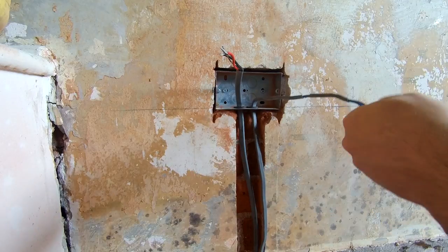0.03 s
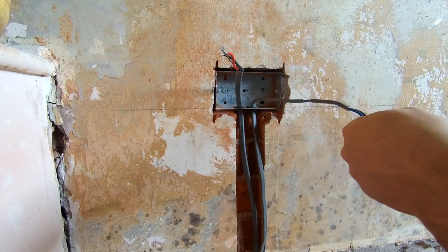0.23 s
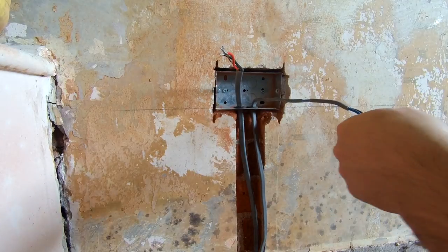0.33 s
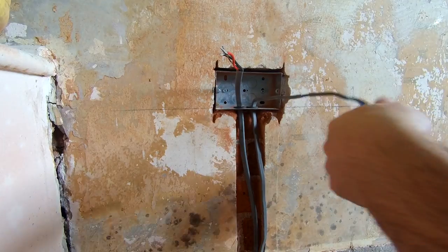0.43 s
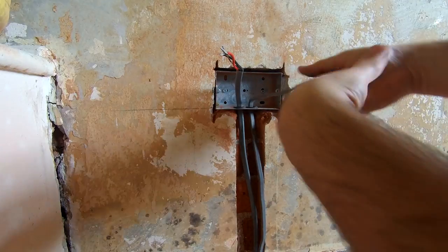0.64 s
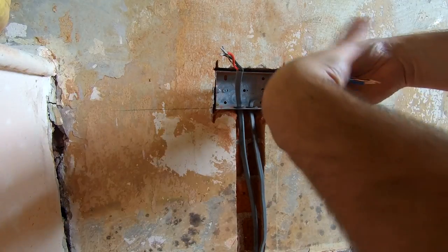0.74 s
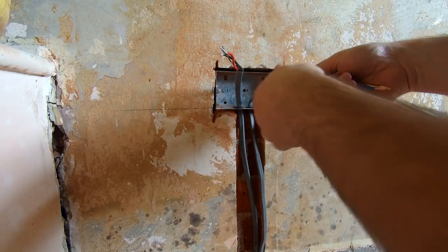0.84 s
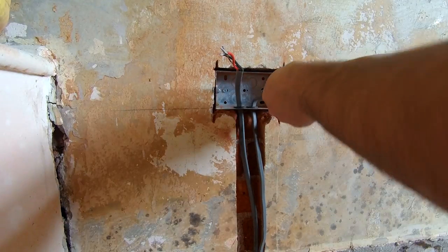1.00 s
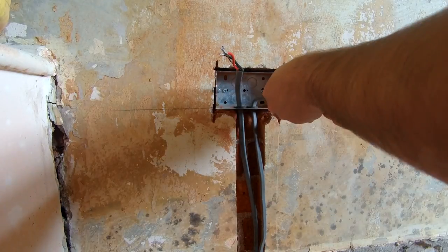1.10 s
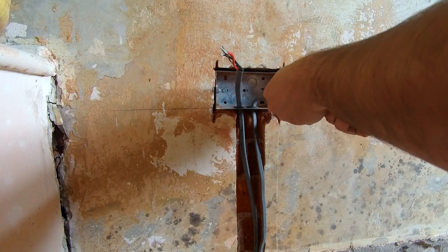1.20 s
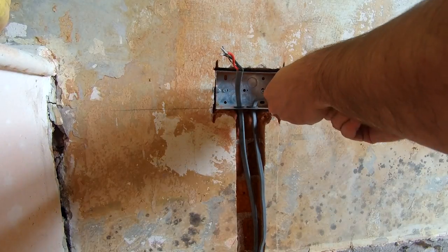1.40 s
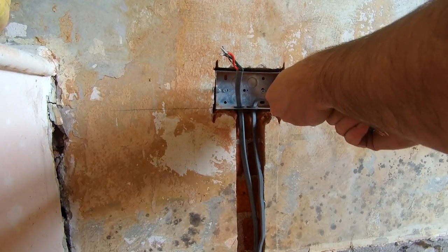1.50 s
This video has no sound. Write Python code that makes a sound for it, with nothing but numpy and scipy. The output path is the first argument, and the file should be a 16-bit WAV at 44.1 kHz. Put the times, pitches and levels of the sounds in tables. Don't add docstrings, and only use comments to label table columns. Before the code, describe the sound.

Wire strippers drop onto a hollow box at about 0.25 s, with a loud boomy thud, steel jaw clacks and plastic handle knocks, a second heavy hit at 0.32 s and weakening bounces until 0.55 s. Bare-room reverberation fades. A faint tap comes near 0.76 s, then soft finger hiss. From 1.15 to 1.53 s, cable quietly ticks and rings a metal socket, with cloth rubbing over low hush.

```python
import sys
import numpy as np
from scipy import signal
from scipy.fft import rfft, irfft
from scipy.io import wavfile
from scipy.ndimage import uniform_filter1d

SR = 44100
rng = np.random.default_rng(int(sys.argv[2]) if len(sys.argv) > 2 else 0)


def how_loud(loudness_db):
    steps = np.asarray(loudness_db, float) / 20
    return 10 ** steps


def master_out(mix):
    frames = np.transpose(np.atleast_2d(mix))
    ceiling = np.clip(frames, -1, 1)
    pcm = np.round(ceiling * 32767).astype(np.int16)
    wavfile.write(sys.argv[1], SR, pcm)


N = 68355

# (frequency [Hz], phase [radians])
FLOOR_PHASE = [(0, 0), (6200, 0.5), (9040, -2.2), (9390, 2.2), (10100, 0.3), (13400, -3), (15100, 12),
               (16400, 8.8)]
# (frequency [Hz], level [dB])
FLOOR_PAN = [(60, 4), (180, 2), (550, -5.5), (1650, -3), (4970, -1.5), (15000, 1.5)]
# (frequency [Hz], phase [radians])
WALL_PHASE = [(0, -1), (5510, 0.53), (7150, -2.7), (9300, -0.4), (12500, 2.15), (14100, 0), (16400, -10.8)]
# (frequency [Hz], level [dB])
WALL_PAN = [(60, -1.3), (240, -1.94), (950, 0.57), (3770, -0.15), (15000, 0.8)]
# (frequency [Hz], correlation [-1..1])
HUSH_SAME = [(60, 0.13), (180, 0.87), (550, 0.46), (1650, 0.49), (4970, 0.64), (15000, 0.23)]


def evened(x):
    return x / np.sqrt(np.mean(x ** 2) + 1e-20)


def read(points, hz):
    f, value = np.transpose(points)
    return np.interp(np.log(hz + 1), np.log(f + 1), value)


def add(mix, s, sound):
    part = mix[round(s * SR):][:len(sound)]
    part += sound[:len(part)]


def colour(x, shape):
    hz = abs(np.fft.fftfreq(2048, 1 / SR))
    log_gain = np.log(how_loud(np.maximum(read(shape, hz), -80)))
    impulse = np.fft.ifft(np.exp(np.conj(signal.hilbert(log_gain)))).real[:1024]
    return signal.oaconvolve(x, impulse / abs(impulse).max())[:len(x)]


def ring(modes, lift_db, spread):
    t = np.arange(SR // 3) / SR
    hz, db, t60 = np.transpose(modes)[:, :, None]
    spot, detune = rng.standard_normal((2, len(modes), 1))
    rise = 1 - np.exp(-t * hz / 0.39)
    decay = how_loud(db + lift_db + 1.9 * spot - 60 * t / t60)
    x = (rise * decay * np.sin(2 * np.pi * hz * (1 + spread * detune) * t)).sum(0)
    return x / abs(x).max()


def noise(shape, same, patchy_db, fade=None):
    frames, hz = N // 256 + 9, np.fft.rfftfreq(1024, 1 / SR)
    a, b, c, d, patches = rng.standard_normal((frames, len(hz), 5)).T
    patches = uniform_filter1d(patches, size=10, axis=0)
    patches = evened(uniform_filter1d(patches, size=10, axis=1))
    db = read(shape, hz)[:, None] + patchy_db * patches
    if fade is not None:
        db = db - 60 * np.arange(frames) * 256 / SR / read(fade, hz)[:, None]
    likeness = np.clip(read(same, hz), -1, 1)[:, None]
    left = a + 1j * b
    right = likeness * left + np.sqrt(1 - likeness ** 2) * (c + 1j * d)
    spectrum = np.array([left, right]) * how_loud(db)
    return evened(signal.istft(spectrum, nperseg=1024, noverlap=768)[1][:, :N])


def placed(x, phase, pan, wet_db, onset_s, scattered=None):
    # (delay [s], left gain [ratio], right gain [ratio])
    reflections = [(.0023, .45, -.3), (.0052, -.2, .3), (.0108, .25, -.1)]
    # (frequency [Hz], t60 [s])
    room_decay = [(60, 0.26), (135, .65), (270, 0.34), (500, 0.56), (1500, 0.47), (3000, 0.51),
                  (6000, 0.43), (11000, 0.33), (16000, 0.17)]
    # (frequency [Hz], correlation [-1..1])
    room_likeness = [(60, .6), (150, 0.44), (500, .5), (1500, 0.65), (4000, 0.57), (8000, 0.3),
                     (14000, -.3)]
    padded = N + 999
    hz = np.fft.rfftfreq(padded, 1 / SR)
    half = np.exp(.5j * read(phase, hz)) * how_loud(read(pan, hz) / 2)
    echoes = 0
    for s, left, right in reflections:
        dulled = np.exp(-2j * np.pi * hz * s - hz / 4000)
        echoes = echoes + np.array([[left], [right]]) * dulled
    direct = irfft(rfft(x, padded) * (np.array([half, 1 / half]) + echoes), padded)[:, :N]

    tail = noise([(60, 0.0032), (16000, 0.00073)], room_likeness, .8, room_decay)
    tail *= np.clip(np.arange(N) / SR / onset_s - .3, 0, 1)
    tail /= np.sqrt((tail ** 2).sum(1).mean())
    source = x if scattered is None else scattered
    return direct + how_loud(wet_db) * signal.fftconvolve(source[None], tail, axes=1)[:, :N]


def box():
    # (time [s], level [dB], lift of deep modes [dB], pitch factor [ratio])
    landings = [
        (.2470, 1.5, 0, .99),
        (0.2809, -8, -1, 1.01),
        (.3200, -0.5, -1.5, 1.175),
        (0.354, -11, -7.5, .96),
        (.3755, -20, -11, 0.84),
        (0.3962, -9, 2.5, .99),
        (0.4221, -13.5, 9.5, 1.2),
        (0.4652, -14, -13, 1.03),
        (0.5088, -23, -8.5, .97),
        (0.547, -42.5, -3, 0.7),
    ]
    # (frequency [Hz], level [dB], t60 [s])
    panel_modes = np.array([(140.9, -22, 0.052), (191, -7, .045), (253.5, -9.5, 0.11), (331.3, 4.5, 0.036),
                            (379, -17.5, 0.047), (528.7, 6.5, 0.026), (590, -10.5, 0.031),
                            (625, -13.5, 0.052), (710, -8, 0.022), (994.6, -15.5, 0.036)])
    # (frequency [Hz], level [dB], t60 [s])
    boom_modes = [(68.43, -8, 0.55), (326.4, 1.5, 0.081), (468.4, -3, 0.54), (523.7, -5, 0.56)]
    # (time [s], level [dB])
    handle_knocks = [
        (0.247, -14.5),
        (0.32, -16),
        (0.344, -17),
        (0.36, -18.5),
    ]
    # (frequency [Hz], level [dB], t60 [s])
    handle_modes = [(1455, 2, 0.021), (1508.4, -6, 0.071), (1880, -10.5, 0.035)]
    out, air = np.zeros((2, N))
    blow = np.hanning(round(0.00062 * SR) + 2)
    blow /= blow.sum()
    deep = panel_modes[:, :1] < 350
    t = np.arange(SR) / SR
    boom = sum(how_loud(db - 60 * t / t60) * np.sin(2 * np.pi * hz * t) for hz, db, t60 in boom_modes)
    boom = boom * np.minimum(t / 0.0089, 1)
    for s, db, deep_db, pitch in landings:
        add(air, s, how_loud(db - 24.5) * boom)
        thud = ring(panel_modes * [pitch, 1, 1], deep * deep_db, 0.028)
        add(out, s, how_loud(db) * signal.oaconvolve(thud, blow))
    for s, db in handle_knocks:
        add(out, s, how_loud(db) * ring(handle_modes, 0, 0.02))
    return placed(out, FLOOR_PHASE, FLOOR_PAN, -4, 0.0052) + air * how_loud(np.array([[-1.5], [1.5]]))


def strippers():
    # (time [s], level [dB], length [s])
    rattles = [
        (0.2468, -23.5, 0.006),
        (0.253, -14, 0.0029),
        (.259, -24.5, 0.009),
        (0.2843, -19, 0.0071),
        (0.3204, -16, 0.0036),
        (0.323, -6.5, 0.0036),
        (0.334, -26, 0.0016),
    ]
    # (frequency [Hz], level [dB])
    steel_tone = [(1000, -29.5), (1800, -5.5), (2400, -8.5), (3500, -6), (6500, -5.5), (11000, -8),
                  (15500, -15.5), (17000, -29)]
    clicks_per_s = 4500
    out, cracks = np.zeros((2, N))
    t = np.arange(900) / SR
    for s, db, length in rattles:
        size, chance = rng.standard_normal(900), rng.random(900)
        burst = how_loud(db - 6 * (t / length) ** 2) * size * (chance < clicks_per_s / SR)
        add(out, s, burst)
        add(cracks, s, np.array([np.linalg.norm(burst)]))
    return placed(colour(out, steel_tone), FLOOR_PHASE, FLOOR_PAN, -4, .005, colour(cracks, steel_tone))


def cable():
    # (time [s], ring level [dB], tick level [dB], tick centre [Hz])
    slips = [(.992, -58.5, -50.5, 3500), (1.136, -62, -63, 5750), (1.1519, -43.5, -33, 9970),
             (1.151, -40.5, -33, 2520), (1.2, -43.5, -44.5, 11500), (1.210, -36, -54.5, 4060),
             (1.2225, -55, -38, 4900), (1.223, -53, -49, 13000), (1.237, -34, -38.5, 5100),
             (1.2535, -37.5, -56, 9070), (1.270, -34.5, -44, 8000), (1.284, -37.5, -45, 3940),
             (1.300, -46.5, -51, 3900), (1.34, -45, -52, 12000), (1.451, -51, -68, 4920),
             (1.4655, -36, -45, 13700), (1.466, -60, -29.5, 2500), (1.4755, -38.5, -40.5, 2720),
             (1.5087, -53, -45, 14400), (1.5122, -56, -47, 13600), (1.533, -46, -73, 3950)]
    # (frequency [Hz], level [dB], t60 [s])
    socket_modes = [(626, -9, 0.056), (937, 1.5, 0.068), (1490, -11.5, 0.06), (1969, 4.5, 0.02),
                    (2490, -5, 0.021), (3280, -10.5, 0.021), (4510, -11.5, 0.021)]
    out, t = np.zeros(N), np.arange(300) / SR
    for s, db, tick_db, tick_hz in slips:
        add(out, s, how_loud(db) * ring(socket_modes, 0, .008))
        band = np.maximum([tick_hz - SR / 20, tick_hz + SR / 20], 800)
        tick = rng.standard_normal(300) * how_loud(-60 * t / 0.007)
        tick = signal.sosfilt(signal.butter(2, band, "band", fs=SR, output="sos"), tick)
        add(out, s, how_loud(tick_db) * tick / abs(tick).max())
    return placed(out, WALL_PHASE, WALL_PAN, -8, 0.0045)


def loose_piece():
    # (time [s], level [dB])
    wall_taps = [
        (0.7573, -33.5),
        (.7945, -45),
    ]
    # (frequency [Hz], level [dB])
    tap_tone = [(350, -27.5), (800, 2.5), (1200, 0), (1500, 5), (2000, -4.5), (3800, -12.5), (6000, -29),
                (15000, -28)]
    # (delay [s], gain [ratio])
    tap_echoes = [(0, -1), (.0012, .8), (.002, -.6), (.0063, -.5), (.0112, -.5)]
    out, once = np.zeros((2, N))
    for s, db in wall_taps:
        add(once, s, how_loud([db]))
        for late_s, gain in tap_echoes:
            add(out, s + late_s, how_loud([db]) * gain)
    return placed(colour(out, tap_tone), WALL_PHASE, WALL_PAN, 3.24, 0.0064, colour(once, tap_tone))


def finger_slide():
    # (start [s], length [s], level [dB])
    strokes = [
        (0.147, 0.11, -65.5),
        (0.754, 0.055, -65),
        (.865, 0.047, -58),
    ]
    # (frequency [Hz], width [Hz], level [dB])
    skin_modes = [(5200, 1530, 1), (6210, 970, -3.5), (8560, 840, -7.5), (10150, 1900, -3.5),
                  (12000, 1800, -5.5), (14500, 1300, -14.5)]
    t, swell = np.arange(N) / SR, np.zeros(N)
    hiss = np.zeros(N)
    for hz, width, db in skin_modes:
        resonance = signal.iirpeak(hz, hz / width, SR)
        hiss += how_loud(db) * evened(signal.filtfilt(*resonance, rng.standard_normal(N)))
    for s, length, db in strokes:
        travel = t[t < length] / length
        add(swell, s, how_loud(db) * abs(np.sin(np.pi * travel ** 0.86)) ** 1.8)
    return placed(swell * evened(hiss), WALL_PHASE, WALL_PAN, -10, .008)


def cloth_rub():
    # (time [s], level [dB])
    rub_level = [(1.0, -82), (1.12, -73), (1.16, -54.5), (1.22, -54.5), (1.3, -50), (1.42, -60.5),
                 (1.48, -45.5), (1.55, -57.5)]
    # (frequency [Hz], level [dB])
    cloth_tone = [(18, -28.5), (30, -11.5), (145, -3), (295, -19), (937, -11), (1130, -20), (1910, -16.5),
                  (10500, -33.5), (16000, -41.5)]
    level = np.interp(np.arange(N) / SR, *np.transpose(rub_level))
    return how_loud(level) * noise(cloth_tone, HUSH_SAME, 3.9)


def shuffling():
    # (time [s], level [dB])
    shuffle_level = [(0, -59.5), (.15, -60), (.24, -61.5), (.6, -67.5), (.9, -81)]
    # (frequency [Hz], level [dB])
    sole_tone = [(59, -60), (100, -25), (249, -1.5), (784, -11.5), (1010, -6), (2000, -6.5), (2320, -13.5),
                 (9610, -22), (16000, -40.5)]
    level = np.interp(np.arange(N) / SR, *np.transpose(shuffle_level))
    return how_loud(level) * noise(sole_tone, HUSH_SAME, 0.5)


def room_hush():
    # (frequency [Hz], level [dB])
    hush_tone = [(15, -34), (25, 4.5), (84, -11), (217, -26), (285, -23.5), (754, -32.5), (6210, -39),
                 (9320, -40), (16000, -42.5)]
    return how_loud(-57) * noise(hush_tone, HUSH_SAME, 1.5)


def scene():
    drop = box() + strippers()
    work = cable() + loose_piece() + finger_slide()
    return drop + work + cloth_rub() + shuffling() + room_hush()


def top_cut(x):
    return signal.sosfilt(signal.butter(12, 16820, fs=SR, output="sos"), x)


def record(dry):
    ceiling = 0.8
    bass_cut = signal.butter(5, 52.3, "high", fs=SR, output="sos")
    x = signal.sosfilt(bass_cut, dry)
    x = ceiling * np.tanh(x / ceiling)
    treble_cut = signal.firwin(255, 16300, window=("kaiser", 9), fs=SR)
    x = signal.oaconvolve(x, treble_cut[None], "same")
    return top_cut(x)


dry = scene()
out = record(dry)
master_out(out)
```